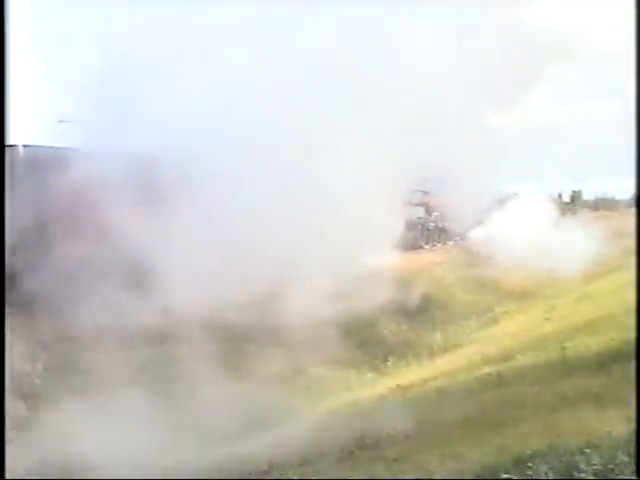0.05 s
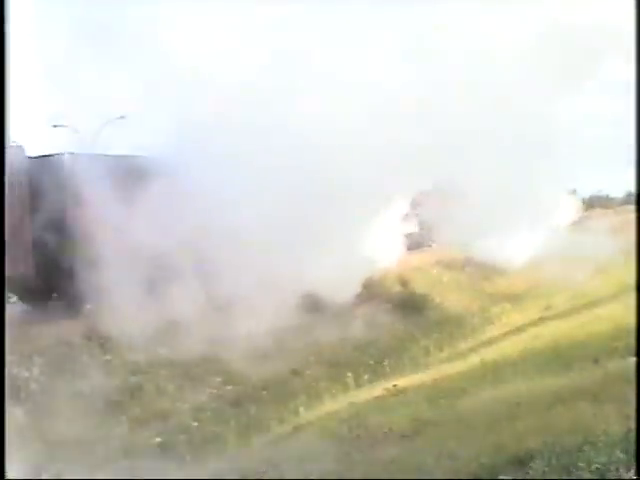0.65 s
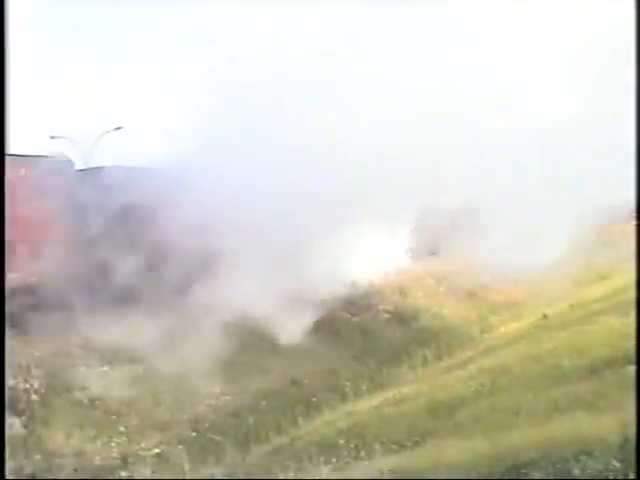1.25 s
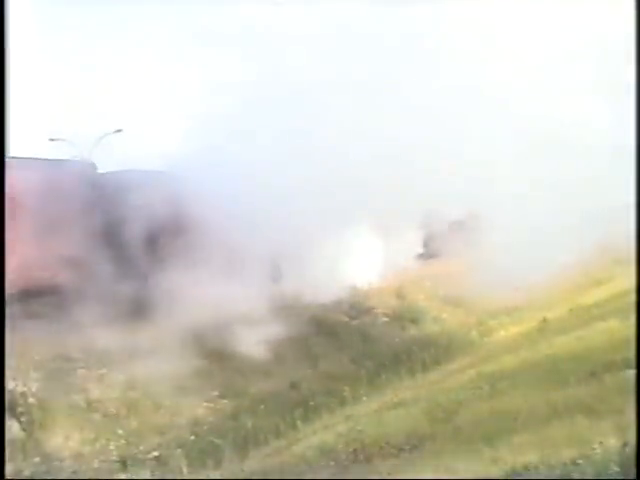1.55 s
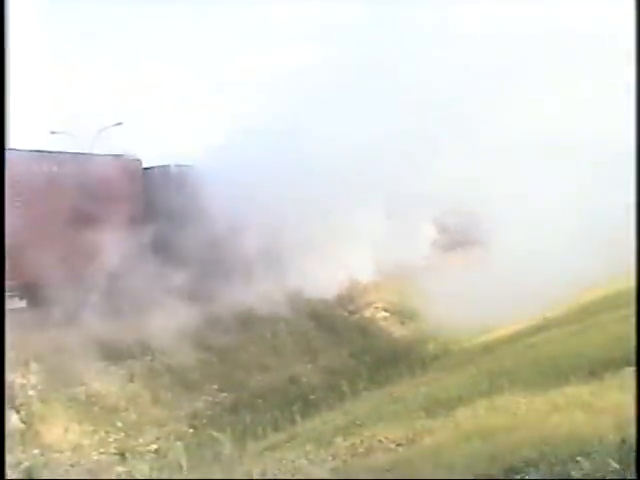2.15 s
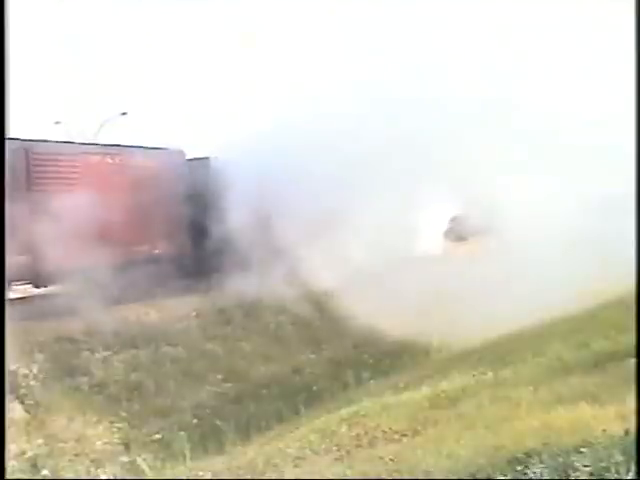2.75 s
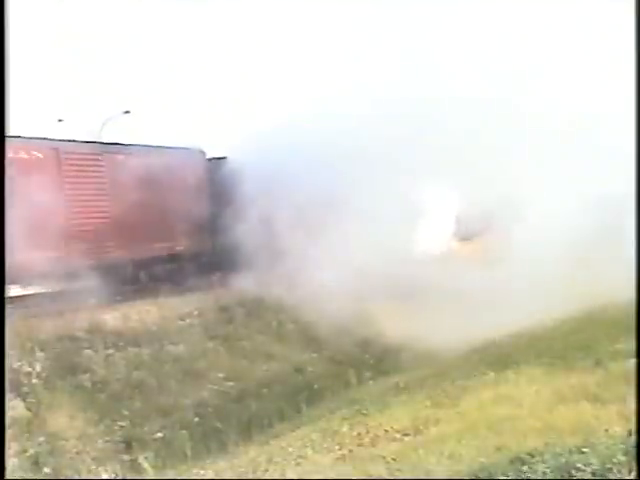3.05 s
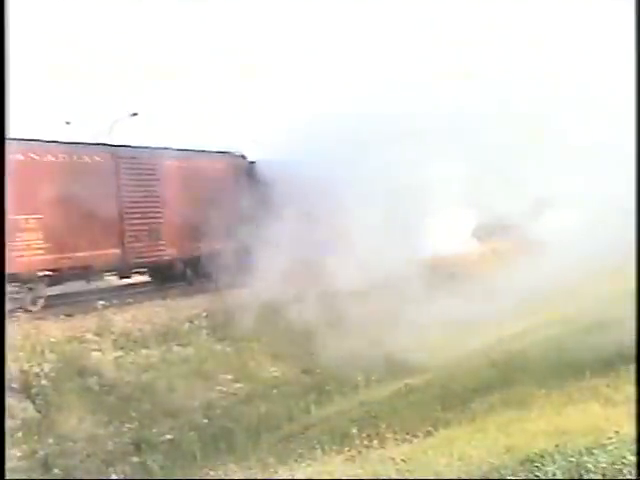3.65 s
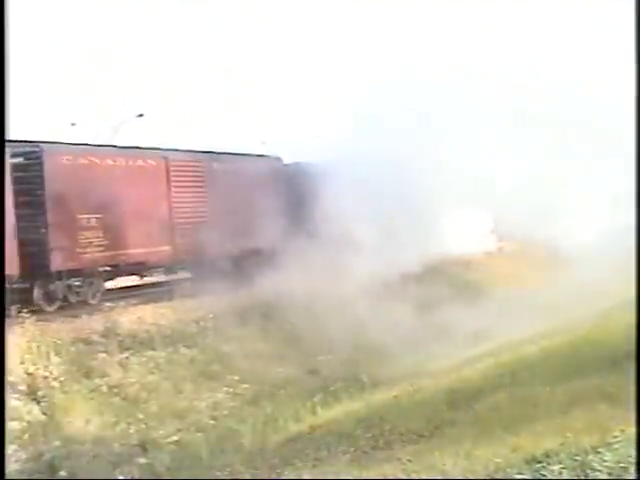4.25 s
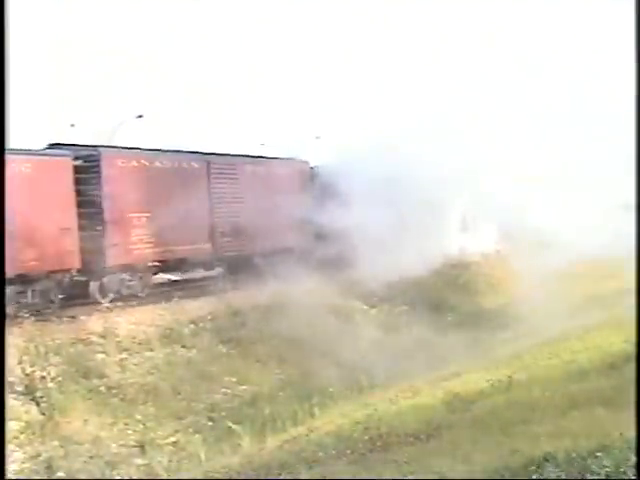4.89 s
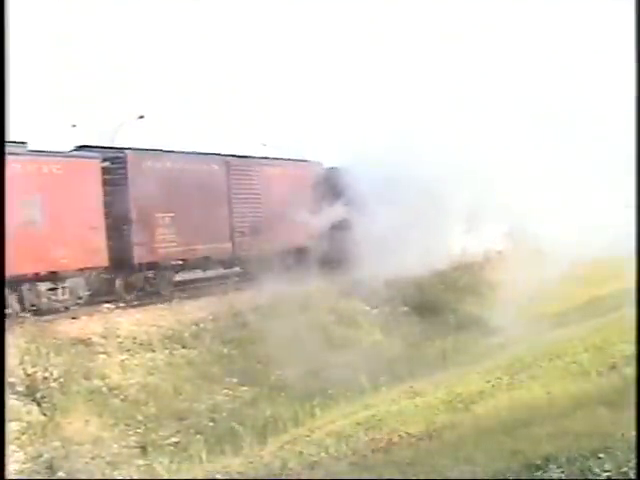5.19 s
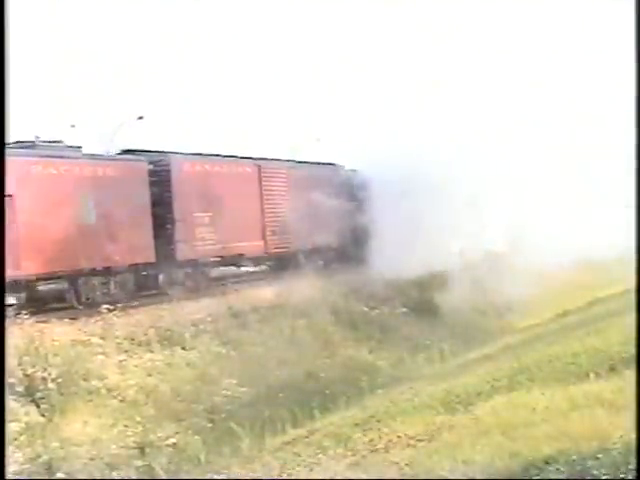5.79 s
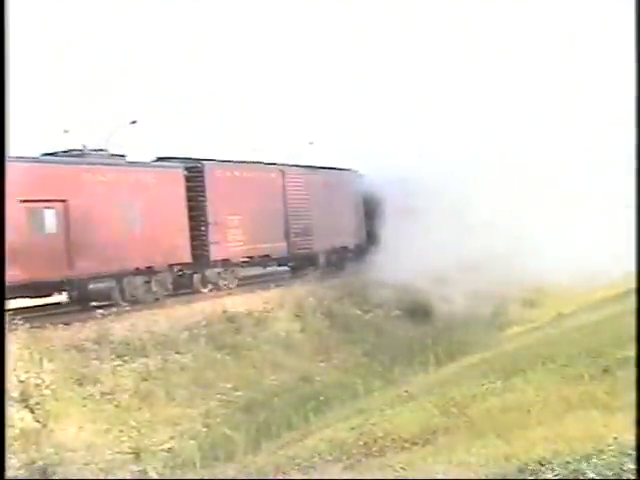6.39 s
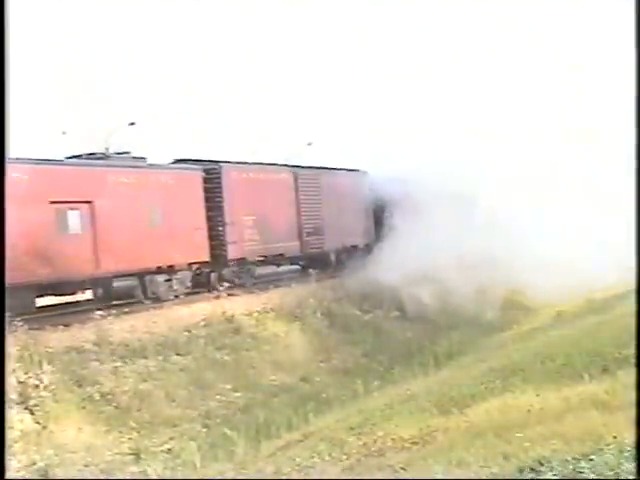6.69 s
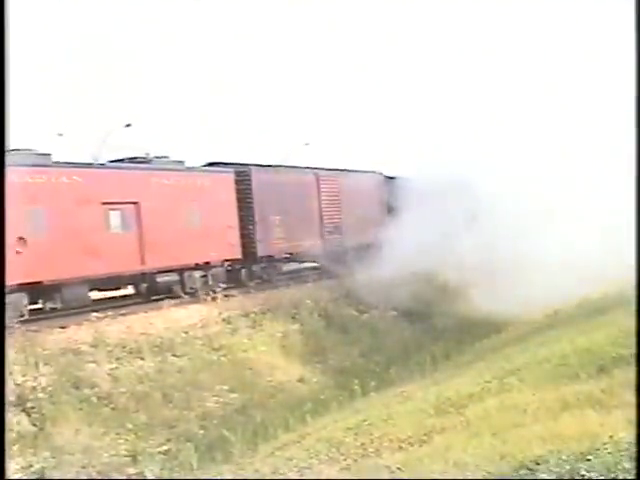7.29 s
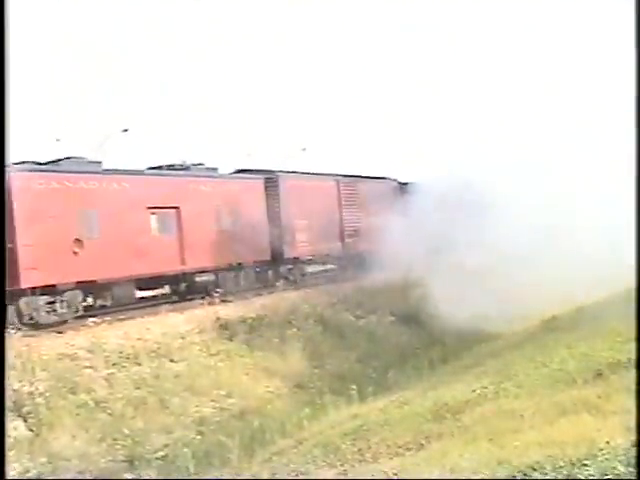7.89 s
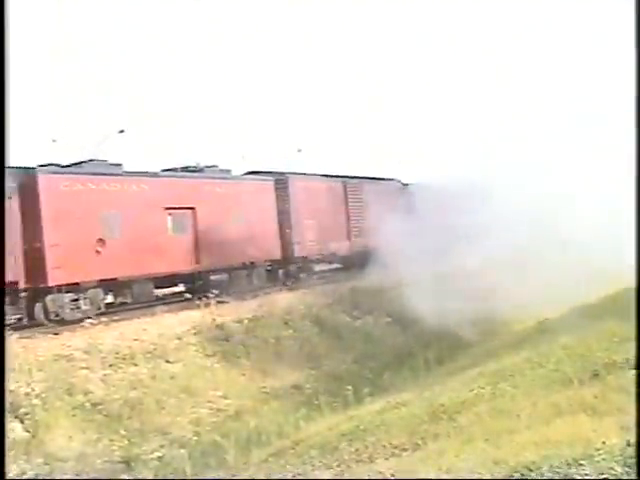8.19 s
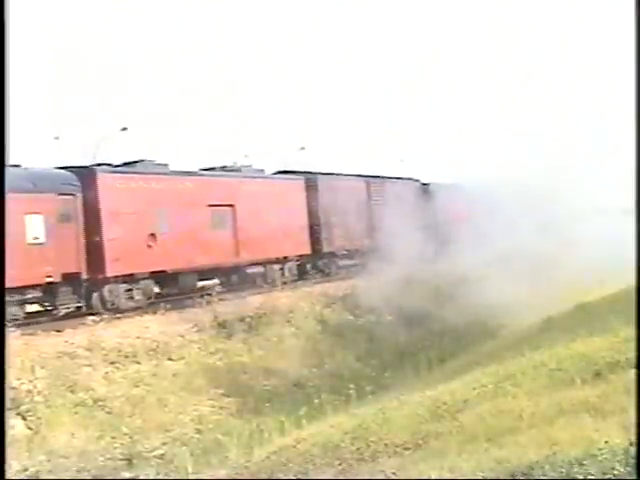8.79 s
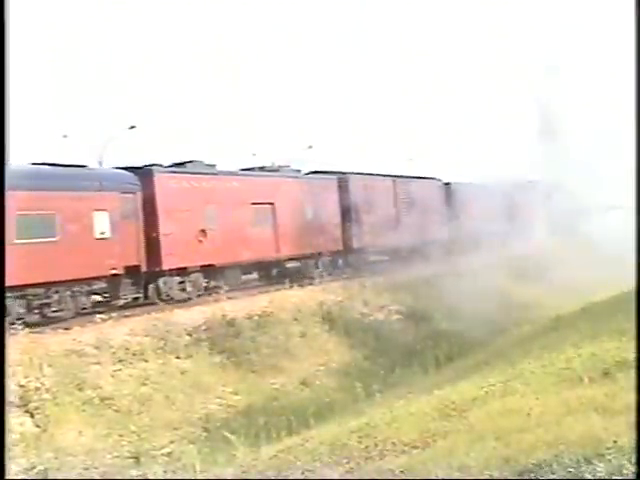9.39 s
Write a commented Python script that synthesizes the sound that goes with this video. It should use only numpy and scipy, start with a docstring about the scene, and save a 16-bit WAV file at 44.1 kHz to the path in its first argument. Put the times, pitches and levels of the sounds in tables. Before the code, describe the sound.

A steam locomotive pulls slowly away, blasting long, loud hisses of steam in a steady rhythm over the low rumble of its cars.

```python
"""On a railway embankment, a steam locomotive pulls slowly away with its cylinder drain valves open.
Each piston stroke lets out a long jet of steam, cut by a short pause; the hiss swirls as the cloud drifts.
Under it the cars rumble, a wheel rings on rough rails and a leak hisses on.
Wind buffets the microphone of a faintly humming camcorder."""
import sys
import numpy as np
from scipy import signal
from scipy.io import wavfile
from scipy.ndimage import map_coordinates

SR = 44100
rng = np.random.default_rng(int(sys.argv[2]) if len(sys.argv) > 2 else 0)


def wrap_up_sound(samples):
    """Save the sound to the file named by the first command line argument, as 16-bit audio."""
    columns = np.atleast_2d(samples).T
    # keep every value between -1 and 1, then stretch to whole-number steps
    tamed = np.clip(columns, -1, 1)
    steps = np.round(tamed * 32767).astype(np.int16)
    wavfile.write(sys.argv[1], SR, steps)


N = 416301
TIME = np.arange(N) / SR
# Noise is shaped on a grid: one row per pitch (a bin), one column per moment (a frame).
FRAME, HOP = 1024, 256
FRAME_S = np.arange(N // HOP + 2) * HOP / SR
BIN_HZ = np.maximum(np.arange(FRAME // 2 + 1), .5)[:, None] * SR / FRAME


def undb(db):
    """Turns decibels into a gain to multiply by."""
    return 10 ** (np.asarray(db) / 20)


def contour(points):
    """Joins (Hz, dB) points into a level for every bin."""
    hz, db = np.transpose(points)
    return np.interp(np.log(BIN_HZ), np.log(hz), db)


def colour(points):
    """A tone colour in dB per bin, scaled to a total power of one."""
    db = contour(points)
    return db - 10 * np.log10(np.mean(undb(db) ** 2))


def hump(hz, octaves):
    """A bell-shaped curve around one pitch."""
    return np.exp(-.5 * (np.log2(BIN_HZ / hz) / octaves) ** 2)


def noise(db):
    """One noise, shaped by a level for every bin and moment (and channel, if given)."""
    grid = dict(nperseg=FRAME, noverlap=FRAME - HOP)
    white = signal.stft(rng.standard_normal((len(FRAME_S) - 1) * HOP), **grid)[2]
    return signal.istft(white * undb(db), **grid)[1][..., :N]


def blend(place, count):
    """Weights that glide smoothly around a ring of cells."""
    distance = (place[:, None] - np.arange(count) + count / 2) % count - count / 2
    weights = np.exp(-2 * np.minimum(distance ** 2, 20))
    return weights / np.linalg.norm(weights, axis=1, keepdims=True)


def eddies(rate, detail):
    """Smooth random ripples of about size one: `rate` a second, finer in pitch with more `detail`."""
    pitch = blend(np.log2(1 + BIN_HZ[:, 0] / 700) * detail, count=140)
    time = blend(FRAME_S * rate, count=300)
    return pitch @ rng.standard_normal((pitch.shape[1], time.shape[1])) @ time.T


def climb(ripples, octaves):
    """Slides ripples up in pitch by so many octaves."""
    bins = np.arange(len(BIN_HZ))[:, None] * 2 ** -octaves
    places = np.broadcast_arrays(bins, np.arange(len(FRAME_S)))
    return map_coordinates(ripples, places, order=1, mode="nearest")


# How the microphone hears a sound far to the right. Each row: pitch in Hz, left minus right in dB.
LEFT_MINUS_RIGHT = [(200, -3.5), (650, -2.5), (1100, -1.5), (1700, -1), (2300, -4.5), (3400, -4),
                    (4600, 0.5), (8000, 0)]

def stereo(db, side_db):
    """Noise from the track drifts right as the train leaves; a little scatters to both sides."""
    pan_db = contour(LEFT_MINUS_RIGHT) * np.linspace(.35, 1.05, len(FRAME_S))
    side = noise(db + side_db)
    return noise(np.array([db + pan_db / 2, db - pan_db / 2])) + np.array([side, -side])


# The tones of the hum. Each row: pitch in Hz, level in dB.
HUM_TONES = [(30, -50), (60, -54), (90, -48.5), (120, -52.5), (150, -50), (210, -48.5)]

def hum():
    """The camcorder's spinning head drum gives a few low, steady tones."""
    return sum(undb(db) * np.sqrt(2) * np.sin(2 * np.pi * (hz * TIME + rng.random()))
               for hz, db in HUM_TONES)


# The wind's tone colour. Each row: pitch in Hz, relative level in dB.
WIND_COLOUR = [(20, -3), (60, 4), (130, 6.5), (220, 3.5), (350, -5), (700, -14), (2000, -53)]
# Single puffs of wind. Each row: middle in seconds, level in dB, half length in seconds.
PUFFS = [(2.953, -21, .018), (5.25, -30, 0.14), (6.016, -27, .019), (6.11, -23, 0.033), (7.583, -21, .025),
         (7.853, -11.5, 0.016), (7.997, -24, .043), (8.707, -11, 0.0064)]

def wind(breeze_db=-35, gust_db=0.5, shared_db=-9):
    """Air tumbles over the microphone, mostly pushing its left and right sides opposite ways."""
    puffs = sum(undb(db) * np.exp(-.5 * ((TIME - middle) / half) ** 2) for middle, db, half in PUFFS)
    db = colour(WIND_COLOUR) + gust_db * eddies(rate=12, detail=0.9)
    shared, opposed = noise(db + shared_db), noise(db)
    return np.array([shared + opposed, shared - opposed]) * (undb(breeze_db) + puffs)


# The tone colour of the rolling cars. Each row: pitch in Hz, relative level in dB.
RUMBLE_COLOUR = [(20, -26), (45, -14), (90, 1.5), (170, -1.5), (300, -3.5), (500, -1), (850, 0.5),
                 (1200, -11.5), (3000, -11), (8000, -50)]

def cars(rumble_db=-29.5, fade_db_per_s=0.43, waver_db=3.5, ring_hz=560, ring_db=-39, ring_waver_db=3):
    """The cars rumble, fading as they draw away, and rough rails keep a wheel ringing unevenly."""
    fading_db = colour(RUMBLE_COLOUR) + rumble_db - fade_db_per_s * FRAME_S
    rumble = undb(fading_db + waver_db * eddies(rate=9, detail=6.65))
    wheel = hump(ring_hz, octaves=0.074)
    wheel /= np.sqrt(np.mean(wheel ** 2))
    ring = wheel * undb(ring_db + ring_waver_db * eddies(rate=17, detail=12))
    return stereo(20 * np.log10(np.hypot(rumble, ring)), side_db=-12)


# The leak's tone colour. Each row: pitch in Hz, relative level in dB.
LEAK_COLOUR = [(100, -21), (400, -11), (800, -0.5), (1500, 2), (3000, -1.5), (6800, -0.5), (11400, -16.5),
               (15300, -25)]

def leak(level_db=-27.5, waver_db=0.2):
    """Steam escapes steadily, even between the blasts."""
    return stereo(colour(LEAK_COLOUR) + level_db + waver_db * eddies(rate=12, detail=7.8), side_db=-18)


# Whooshes that stand out of the hiss. Each row: middle in seconds, length in seconds,
# pitch at the middle in Hz, rise in octaves per second, boost in dB.
WHOOSHES = [(.8, 0.55, 1420, -0.0056, 6.5), (1.59, 0.31, 4060, 1.7, 6.5), (2.32, 0.14, 6800, .7, 7),
            (2.45, 0.39, 2480, 0.69, 6.5), (3.48, 0.56, 3660, 1.4, 2), (3.7, 0.13, 6200, .7, 9),
            (4.21, 0.19, 4340, 1, 4), (4.432, 0.28, 3200, -0.44, 6.5), (5.39, 0.18, 3080, 0.17, 9.5),
            (5.732, 0.39, 4680, 0.7, 5.5), (6.44, 0.22, 2870, .1, 4.5), (7.99, 0.14, 4400, -0.15, 10),
            (9.28, 0.47, 3950, 1.9, 6.5)]

def swirls(width_share=0.086):
    """Bands of hiss swell, glide and fade as the jet sweeps over the ground; gives dB."""
    db = np.zeros((len(BIN_HZ), len(FRAME_S)))
    for middle, length, middle_hz, rise, boost_db in WHOOSHES:
        now = np.abs(FRAME_S - middle) < length / 2
        since = FRAME_S[now] - middle
        hz = middle_hz * 2 ** (rise * since)
        distance = (BIN_HZ - hz) / (width_share * hz)
        swell = np.sqrt(np.cos(np.pi * since / length))
        # sound paths that add up in one band cancel on either side of it
        db[:, now] += boost_db * swell * np.exp(-.5 * (distance / 2) ** 2) * np.cos(distance)
    return db


def echoes(ground_ms, side_ms, ground_db=1.0, side_db=1.2, dull_hz=6000):
    """Two close echoes, likely off the ground and the side of the cars, lift and dip pitches; gives dB."""
    phase_per_ms = 2 * np.pi * BIN_HZ / 1000
    ripple_db = ground_db * np.cos(phase_per_ms * ground_ms) + side_db * np.cos(phase_per_ms * side_ms)
    return ripple_db / (1 + (BIN_HZ / dull_hz) ** 2)


# The jet's tone colour. Each row: pitch in Hz, relative level in dB.
STEAM_COLOUR = [(100, -16.5), (250, -24), (450, -13), (700, -11.5), (950, -5), (1400, -3.5), (1800, -3.5),
                (2900, -1), (3800, -2), (5300, -1), (7500, -3.5), (10000, -12.5), (13300, -20),
                (15300, -35)]
# One blast per piston stroke. Each row: start and end in seconds, level in dB, low roar boost and its
# growth over the stroke in dB, higher rush boost and its growth in dB, ground echo delay at
# mid-stroke in ms, that delay's shrink rate per second, side echo delay in ms.
STROKES = [(-.1, 0.35, -13, 0, -4, 1, -4.5, 1.03, .8, 1.86),
           (0.445, 1.214, -13, 2, 3, -1.5, -3, 0.8, 0.14, 2.8),
           (1.279, 2.097, -13.5, 3.5, -3, -0.3, -2, 0.72, .3, 2.1),
           (2.191, 2.942, -13, 1.7, 4.5, -2, -1, 0.36, .8, 0.98),
           (3.003, 3.806, -13, 0.9, -6.5, 2.5, -4.5, 0.54, 0.57, 1.52),
           (3.888, 4.618, -12.5, 4.5, -7, -2, -1.5, 1.26, .5, 1.15),
           (4.68, 5.453, -15, 1.9, -5, 4.5, -1.5, 0.41, 0.033, 2.4),
           (5.547, 6.253, -16, 6, 8.5, -1, 1.5, 1.13, 0.44, 1.18),
           (6.317, 7.076, -14, 1.3, -2.5, -0.5, -0.5, 0.7, -0.16, 1.48),
           (7.163, 7.856, -15, 1.6, -7.5, 2.3, -4, 1.4, -0.17, 0.65),
           (7.915, 8.66, -14.5, 0.3, -1.5, 3.5, 3, 0.39, -.1, 2),
           (8.742, 9.417, -13.5, 3.2, -2.6, 0.6, -3, 0.75, -0.24, 1.52)]

def steam_jet(open_s=0.0062, close_s=0.036, arch_db=0.56, spit_db=2.5, spit_s=0.11,
              drift_db=1.17, flutter_db=0.5):
    """Churning steam blasts out at each stroke; its roar and rush swell or fade as eddies ripple it."""
    # pick the stroke under way at each moment, switching in the pauses
    rows = np.array(STROKES)
    pauses = (rows[:-1, 1] + rows[1:, 0]) / 2
    (start, end, level_db, roar_db, roar_growth, rush_db, rush_growth,
     ground_ms, shrink, side_ms) = rows[np.searchsorted(pauses, FRAME_S)].T
    since_middle = FRAME_S - (start + end) / 2
    progress = since_middle / (end - start)  # -0.5 to 0.5 through a stroke
    db = colour(STEAM_COLOUR) + level_db + swirls()
    db += echoes(ground_ms * np.exp(-shrink * since_middle), side_ms)
    # the flow is strongest at mid-stroke
    db += arch_db * np.cos(2 * np.pi * progress)
    db += (roar_db + roar_growth * progress) * hump(920, octaves=0.77)
    # a harder rush also brings more fizz at the very top and more body below
    fizz = 0.61 * hump(12200, octaves=0.16)
    db += (rush_db + rush_growth * progress) * (hump(2570, octaves=0.63) + fizz)
    db += 3 * np.maximum(rush_db, 0) * hump(236, octaves=0.57)
    # each blast starts with a duller spit before the jet is fully up
    spit = np.exp(-np.maximum(FRAME_S - start, 0) / spit_s)
    db += spit_db * spit * (hump(3300, octaves=2) - 1)
    # slow ripples in the upper hiss drift upwards, quick ones flutter in place
    rise_octaves = 0.9 * since_middle * hump(4400, octaves=1)
    db += drift_db * climb(eddies(rate=4, detail=8.01), rise_octaves)
    db += flutter_db * eddies(rate=28, detail=1.58)
    # many shifting paths through the hot cloud make it sound hollow
    db += (1.5 + hump(2000, octaves=1.5)) * eddies(rate=15, detail=25)
    # the bank scatters the low roar sideways, and some of the bright hiss
    side_db = -27 + 9 * hump(1130, octaves=1) + 7 * hump(5500, octaves=0.24)
    # the valve snaps open and closes more gently
    valve = sum(np.clip((TIME - on) / open_s, 0, 1) * np.clip((off - TIME) / close_s, 0, 1)
                for on, off, *_ in STROKES)
    return stereo(db, side_db) * valve


def scene():
    """The steam blasts over the leak, cars, wind and hum."""
    return steam_jet() + leak() + cars() + wind() + hum()


def record(dry, ceiling=1.1, top_hz=15200):
    """The camcorder rounds off the loudest peaks and cuts the highest treble."""
    rounded = ceiling * np.tanh(dry / ceiling)
    return signal.sosfilt(signal.ellip(10, .2, 80, top_hz, fs=SR, output="sos"), rounded)


dry = scene()
out = record(dry)
wrap_up_sound(out)
```